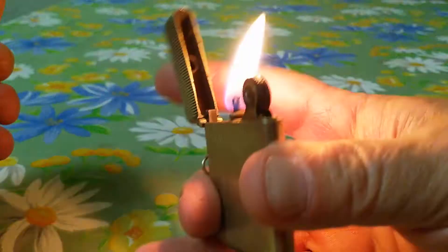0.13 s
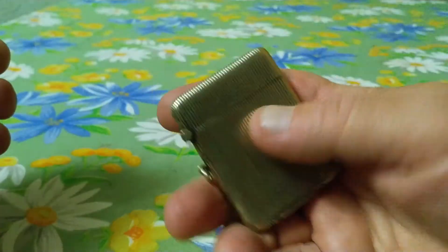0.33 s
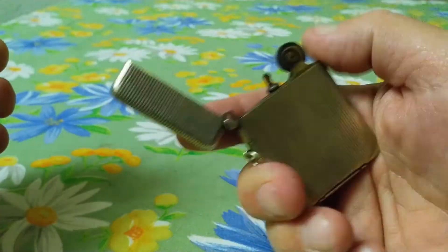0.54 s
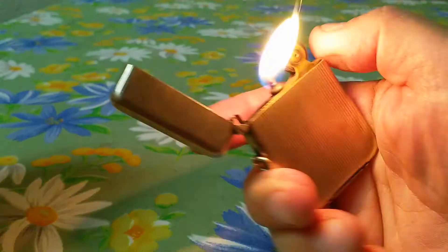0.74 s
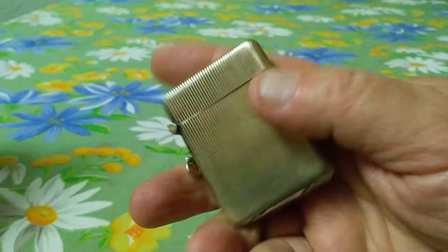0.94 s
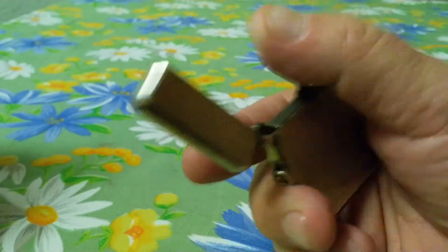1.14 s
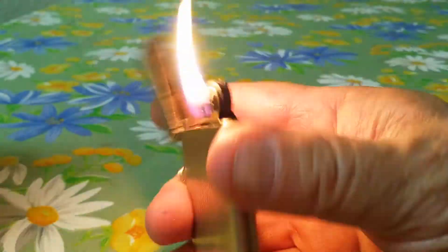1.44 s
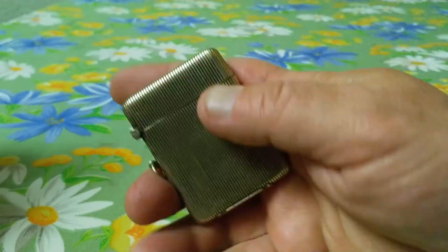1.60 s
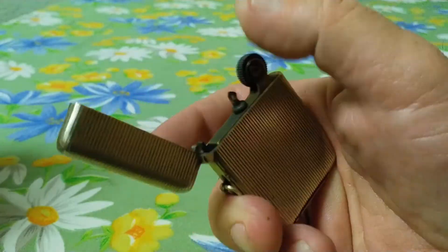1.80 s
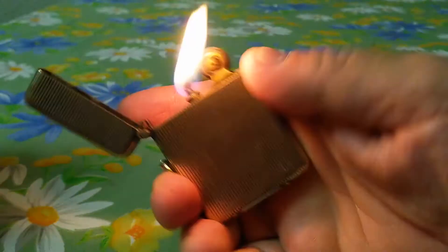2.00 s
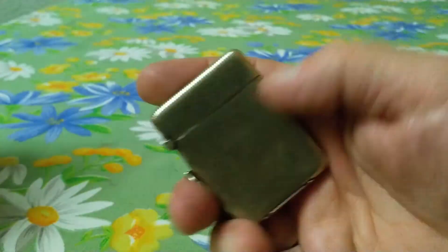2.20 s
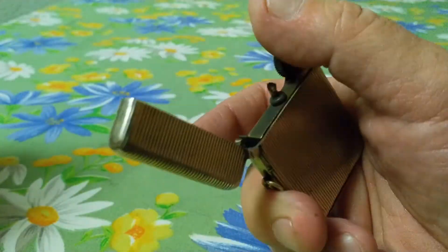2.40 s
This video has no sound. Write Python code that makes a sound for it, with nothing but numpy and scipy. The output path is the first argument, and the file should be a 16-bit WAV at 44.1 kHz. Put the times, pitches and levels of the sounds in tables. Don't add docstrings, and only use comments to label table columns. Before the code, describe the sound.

Sharp metallic lighter clicks and short flint rasps, very close, ending with soft table knocks

```python
import sys
import numpy as np
from scipy import signal
from scipy.fft import rfft, irfft
from scipy.io import wavfile
from scipy.ndimage import uniform_filter1d

SR = 44100
rng = np.random.default_rng(int(sys.argv[2]) if len(sys.argv) > 2 else 0)


def volts_from_db(level):
    exponent = np.asarray(level, float) / 20
    return 10 ** exponent


def generate_wav(signal):
    frames = np.transpose(np.atleast_2d(signal))
    scaled = np.clip(frames, -1, 1) * 32767
    pcm = np.round(scaled).astype(np.int16)
    wavfile.write(sys.argv[1], SR, pcm)


N = 112454

# start in seconds, level in dB of the 10 kHz resonances,
# then shell, wall and edge resonances in dB relative to that level.
OPENS = [
    (0.537, -23.5, -24.5, -3.5, -1.5),
    (1.1885, -27.5, -17.5, 2, 3),
    (1.8227, -28, -27.5, 7, -2),
    (2.3875, -25.5, -18, -0.5, -1.5),
]
APART = 0.55


def evened(x):
    return x / np.sqrt(np.mean(x ** 2) + 1e-20)


def read(points, hz):
    f, value = np.transpose(points)
    return np.interp(np.log(hz + 1), np.log(f + 1), value)


def coloured(x, spectrum):
    gain = volts_from_db(read(spectrum, np.fft.rfftfreq(x.shape[1], 1 / SR)))
    return irfft(rfft(x) * gain, x.shape[1])


def resonate(x, hz, width):
    r = np.exp(-np.pi * width / SR)
    return signal.lfilter([1 - r * r, 0, r * r - 1], [2, -4 * r * np.cos(2 * np.pi * hz / SR), 2 * r * r], x)


def pair(length, share=APART):
    a, b = rng.standard_normal((2, length))
    share = np.clip(share, 0, 1)
    return np.array([a, np.sqrt(1 - share ** 2) * a + share * b])


def hump(t, rise, fall):
    return np.exp(np.where(t < 0, t / rise, -t / fall))


def add(mix, s, sound):
    # time in seconds, left minus right level in dB.
    place = [(0, 0.5), (.29, 0.5), (.95, 0.5), (1.19, 2.5), (1.33, 0.5), (1.6, 0.5), (1.85, 0), (2.19, 2),
             (2.39, 2)]
    side = np.interp(s, *np.transpose(place)) / 2
    k = round(s * SR)
    sound = sound[:, max(-k, 0):] * volts_from_db(np.array([[side], [-side]]))
    part = mix[:, max(k, 0):][:, :sound.shape[1]]
    part += sound[:, :part.shape[1]]


def camera_floor():
    # frequency in Hz, hiss density in dB per Hz.
    hiss_spectrum = [(60, -49.5), (115, -29), (160, -7.5), (280, -4.5), (500, -13.5), (3000, -15),
                     (9000, -24), (16000, -25.5)]
    # motor resonance in Hz, width in Hz, level in dB.
    hum = [(154.8, 32, -80.5), (279, 49, -74.5), (655.5, 46, -82), (1039, 63, -78)]
    # frequency in Hz, left-right likeness from -1 to 1.
    coherence = [(100, 0.91), (500, 0.91), (2400, 0.22), (15000, -0.15)]
    hiss_db = -67.5
    frames, hz = N // 128 + 5, np.fft.rfftfreq(512, 1 / SR)
    a, b, c, d, patches = rng.standard_normal((frames, 257, 5)).T
    patches = uniform_filter1d(patches, 10, 0)
    patches = evened(uniform_filter1d(patches, 20, 1))
    same = np.clip(read(coherence, hz), -1, 1)[:, None]
    left = a + 1j * b
    right = same * left + np.sqrt(1 - same ** 2) * (c + 1j * d)
    z = np.array([left, right]) * volts_from_db(2.6 * patches)
    noise = signal.istft(z, nperseg=512, noverlap=384)[1][:, :N]
    out = volts_from_db(hiss_db) * evened(coloured(noise, hiss_spectrum))
    motor = rng.standard_normal(N)
    for f, width, db in hum:
        out = out + volts_from_db(db) * evened(resonate(resonate(motor, f, width), f, width))
    return out


def room(x):
    # frequency in Hz, 60 dB decay time in seconds.
    decay = [(300, 0.04), (1500, 0.16), (4500, 0.11), (12000, 0.1)]
    gap_s, bend = 0.0023, 1.08
    taps = rng.standard_normal((3, 2, 12000)) * (np.arange(12000) > gap_s * SR)
    hz, t, z = signal.stft(taps, SR, nperseg=128)
    fade = volts_from_db(-60 * (t / read(decay, hz)[:, None]) ** bend)
    tail = signal.istft(z * fade, SR, nperseg=128)[1]
    tail[:, 1] = 0.26 * tail[:, 0] + 0.98 * tail[:, 1]
    turn = np.arange(N) / SR * 11
    out = np.zeros((2, N))
    for k in range(3):
        response = tail[k] / np.linalg.norm(tail[k, 0])
        out += signal.fftconvolve(x * np.cos(turn + k * np.pi / 3), response, axes=1)[:, :N]
    return out


def finger_rubs():
    # centre time in seconds, level in dB, band centre in Hz, width in Hz.
    rubs = [(.205, -70, 2110, 120), (.605, -72, 2025, 119), (1.0, -66.5, 2080, 120),
            (1.069, -66.5, 1366, 900), (1.13, -67.5, 1280, 500), (1.71, -70, 3940, 1467),
            (1.705, -69.5, 9700, 2000), (1.804, -61.5, 1800, 910), (2.026, -62, 4350, 1560)]
    length_s = 0.013
    out, t = np.zeros((2, N)), np.arange(-3000, 3000) / SR
    for s, db, hz, width in rubs:
        rub = evened(resonate(resonate(pair(len(t)), hz, width), hz, width))
        add(out, s + t[0], volts_from_db(db) * np.exp(-(t / length_s) ** 2) * rub)
    return out


def thump(out, s, db, hz, rise_s, t60, push):
    overtone, overtone_db, push_s = 1.777, -8.5, 0.00037
    t = np.arange(5000) / SR
    modes = np.sin(2 * np.pi * hz * t) + volts_from_db(overtone_db) * np.sin(2 * np.pi * overtone * hz * t)
    modes = volts_from_db(-60 * t / t60) * (1 - np.exp(-t / rise_s)) ** 2 * modes
    air = push * t / push_s * np.exp(-t / push_s) * [[0.55], [1]]
    part = out[:, round(s * SR):][:, :len(t)]
    part += volts_from_db(db) * (modes + air)[:, :part.shape[1]]


def hand_thuds():
    # start in seconds, level in dB, pitch in Hz.
    thuds = [(.006, -32.5, 298), (.287, -43.5, 221), (.54, -40, 362), (0.714, -40.5, 350),
             (.954, -42.5, 409), (1.191, -43.5, 379), (1.333, -35, 260), (1.595, -37, 382),
             (1.824, -43.5, 341), (1.955, -36.5, 364), (2.188, -31, 241)]
    out = np.zeros((2, N))
    for s, db, hz in thuds:
        thump(out, s, db, hz, rise_s=0.00066, t60=0.039, push=volts_from_db(-2.5))
    return out


def table_knocks():
    # start in seconds, level in dB, pitch in Hz.
    knocks = [(2.276, -49, 168), (2.288, -42, 234), (2.312, -36.5, 232), (2.343, -54, 271),
              (2.379, -31, 217.5), (2.388, -35, 329), (2.399, -31, 275), (2.417, -34, 227),
              (2.424, -38, 297), (2.429, -29.5, 315), (2.443, -47, 250), (2.455, -38.5, 227)]
    out = np.zeros((2, N))
    for s, db, hz in knocks:
        thump(out, s, db, hz, rise_s=0.0012, t60=0.044, push=0)
    return out


def wheel_and_flame():
    # peak time in seconds, level in dB, rise in seconds, fall in seconds.
    rasps = [(.005, -34, 0.0031, .012), (.714, -35.5, 0.003, 0.012), (1.33, -34.5, 0.0029, 0.013),
             (1.955, -35, 0.0029, 0.013), (1.941, -45, 0.0045, 0.0071), (1.969, -50, 0.0018, 0.0037),
             (2.546, -48.5, 0.0045, 0.033)]
    # peak time in seconds, level in dB.
    sputter = [(.73, -57.5), (1.97, -66)]
    # frequency in Hz, rasp density in dB per Hz.
    rasp_spectrum = [(180, -7), (300, 4), (425, 1), (2000, -15.5), (3760, -3.5), (9240, -7.5),
                     (16000, -9.5)]
    bursts = rasps + [(s, db, 0.004, 0.065) for s, db in sputter]
    out, t = np.zeros((2, N)), np.arange(-2000, 9000) / SR
    for s, db, rise, fall in bursts:
        grit = volts_from_db(2.5 * evened(uniform_filter1d(rng.standard_normal(len(t)), 60)))
        rasp = evened(coloured(pair(len(t)) * grit, rasp_spectrum))
        add(out, s + t[0], volts_from_db(db) * hump(t, rise, fall) * rasp)
    return out


def lid_ring():
    # start in seconds, lid in dB, insert rattle in dB, rattle pitch in Hz, tank in dB.
    rings = [(0.2866, -35, -43.5, 3146, -53.5), (0.955, -48, -46.5, 3146, -51.5),
             (1.189, -61, -58.5, 3146, -73), (1.333, -61, -60, 3760, -41.5), (1.5963, -25, -49, 4020, -80),
             (1.821, -42, -68, 3146, -84), (1.957, -72.5, -71, 3600, -48.5), (2.188, -70, -60, 3530, -48.5)]
    # lid mode in Hz, level in dB.
    modes = [(9750, -9), (9845, -6), (9964, -3), (10100, -6), (10230, 0), (10310, -4)]
    # multiple of the rattle pitch, width in Hz, level in dB.
    rattle = [(1.001, 168, -3.5), (1.05, 1403, 0.62)]
    # frequency in Hz, width in Hz, level in dB.
    tank = [(1042, 200, 4.5), (595, 32, -3)]
    lid_t60, buzz_t60, rise_s = 0.075, 0.076, 0.00052
    clap_hz, clap_db, clap_s = 10160, 14.5, 0.0029
    out, t = np.zeros((2, N)), np.arange(6000) / SR
    clap = np.exp(-(t / clap_s) ** 2)
    for s, db, rattle_db, rattle_hz, tank_db in rings:
        ring = volts_from_db(db + clap_db) * clap * np.sin(2 * np.pi * clap_hz * t)
        for f, g in modes:
            phase = rng.random((2, 1)) * [[0.15], [0.25]]
            ring = ring + volts_from_db(db + g - 60 * t / lid_t60) * np.sin(2 * np.pi * (f * t + phase)) * (1 - clap)
        insert = [(f * rattle_hz, width, g) for f, width, g in rattle]
        for level, group in ((rattle_db, insert), (tank_db, tank)):
            for f, width, g in group:
                buzz = evened(resonate(resonate(pair(len(t), 0.24), f, width), f, 2 * width))
                ring = ring + volts_from_db(level + g - 60 * t / buzz_t60) * buzz
        add(out, s, ring * np.minimum(t / rise_s, 1))
    return out


def open_lid_hum():
    hz, under_click_db, t60, length_s = 9968, -38, 0.7, 0.105
    out, t = np.zeros((2, N)), np.arange(6000) / SR
    for s, db, *_ in OPENS[:-1]:
        tone = np.sin(2 * np.pi * (hz * t + rng.random((2, 1)) / 4))
        add(out, s, volts_from_db(db + under_click_db - 60 * t / t60) * tone * np.exp(-(t / length_s) ** 6))
    return out


def lid_snap():
    start_s, db, blow_hz, rebound_hz = 2.1894, -4, 12800, 500
    out, t = np.zeros((2, N)), np.arange(-100, 160) / SR

    def bell(hz, late_s):
        return hz / blow_hz * np.exp(-(np.pi * hz * (t - late_s)) ** 2)

    snap = 0.2 * bell(blow_hz, -0.00006) - bell(blow_hz, 0) + 0.62 * bell(rebound_hz, 0.00068)
    add(out, start_s + t[0], volts_from_db(db) * snap * np.ones((2, 1)))
    return out


def case_resonances(drive, group, widen):
    grip = 0.025
    out = 0
    for k, (f, width, db) in enumerate(group):
        shift = 1 + grip * (1 - 2 * rng.random())
        mode = resonate(resonate(drive, f * shift, widen * width), f, 4.54 * width)
        out = out + (-1) ** k * volts_from_db(db) * evened(mode)
    return out


def contacts():
    # start in seconds, level in dB of the 10 kHz resonances,
    # then shell, wall and edge in dB relative to it.
    closes = [(.2859, -37.5, 6.5, -28, -10), (.2876, -24, -12.5, -10, -4), (.9522, -42.5, 9.5, -4.5, -16),
              (.9538, -32.5, -6.5, -5, 0.5), (.955, -45.5, 10.5, -13, -9), (1.595, -40.5, 9.5, -3.5, -19),
              (1.5964, -29.5, 1, -4.5, 1), (2.188, -43.5, 16, -6, 16)]
    stops = [(.0041, -31.5, 1.5, 8, -9), (.0053, -26.5, -20.5, -8.5, 1), (.0058, -26.5, -19.5, -7, 4.5),
             (.7129, -48, -22, -15, 18.5), (.7146, -31, -16, -6.5, -1), (.7165, -24.5, -14, -9, -6),
             (1.3297, -36.5, -6, -14, 13), (1.3307, -28.5, -5, -2, -7), (1.332, -28.5, -5, 3.5, -12),
             (1.954, -28.5, -14.5, -9.5, -4), (1.9547, -27.5, -11.5, -6.5, 1.5),
             (1.9562, -28.5, -5, -5.5, -8)]
    # start in
    # seconds, level in dB, then wall and edge in dB relative to it.
    teeth = [(.5362, -45.5, -1.5, 10.5), (.6873, -56.5, -6, -13), (.6912, -68, 2, 15), (.7066, -57, -6, 9),
             (.7554, -50.5, -0.5, -9), (1.1879, -47, 21.5, -10), (1.3002, -68, -5, 22),
             (1.3108, -49, 6.5, 4.5), (1.324, -59.5, 2, 16), (1.3436, -35.5, -16.5, 1),
             (1.3675, -50.5, -2, -9), (1.8214, -37, -2, 9), (1.9412, -52, -8, 7),
             (1.9687, -44.5, -11, -9.5), (2.5325, -58, -17.5, -8), (2.537, -69, -1, 11),
             (2.5425, -47, -12, 2), (2.5469, -41.5, 2, 4)]
    ticks = [(.0535, -61, -12, -4), (.184, -58.5, 0, -3), (.2048, -64.5, -4, -4), (.7696, -69, -6, -8),
             (.7791, -70, -12, -6), (.7878, -61.5, -4, -2), (.7992, -64.5, 3, -2), (.908, -70.5, 3, -11),
             (1.064, -62, -6, -11), (1.0692, -54, -6, -12), (1.397, -70, 5, 7), (1.7901, -49.5, -0.5, -3),
             (2.0001, -54.5, -12, -9), (2.107, -69.5, -17, -8), (2.3403, -52, -5.5, -9.5)]
    # frequency in Hz, width in Hz, level in dB.
    shell_modes = [(633, 654, -2), (1098, 240, -2), (1696, 1030, -8)]
    wall_modes = [(4045, 1600, -6), (4820, 1400, 4), (6680, 1860, -6.5)]
    core_modes = [(7930, 1020, -4), (9250, 600, 5.5), (10380, 680, -4.5), (11420, 480, 1)]
    edge_modes = [(12730, 1100, -14.5), (13800, 850, 8), (16550, 1100, -9.5)]
    # frequency in Hz, width in Hz, level in dB.
    shut_wall_modes = [(3146, 480, 3), (3900, 450, -1), (2552, 1200, -8.5), (5900, 3800, 3.5)]
    light_shell_db = -5
    lead_s, lead_db = 0.0024, -26
    # rows, chatter rise and fall in seconds, clean blow over chatter in dB, wall.
    kinds = (
        (OPENS, 0.00036, 0.00058, 13.1, wall_modes),
        (closes, 0.00013, 0.00045, 9.5, shut_wall_modes),
        (stops, 0.00028, 0.00025, 15.2, wall_modes),
        (teeth, 0.00045, 0.00032, 7.6, wall_modes),
        (ticks, 0.00067, 0.00091, 3, wall_modes),
    )
    out, spread, t = np.zeros((2, N)), np.zeros((2, N)), np.arange(-500, 700) / SR
    for rows, rise, fall, blow_db, walls in kinds:
        envelope = hump(t, rise, fall) + volts_from_db(lead_db) * hump(t, lead_s, fall)
        blow = volts_from_db(blow_db) * (t == 0)
        for s, db, *shell, wall, edge in rows:
            shell_db = shell[0] if shell else light_shell_db
            groups = ((shell_modes, shell_db, 0.2), (walls, wall, APART), (core_modes, 0, APART),
                      (edge_modes, edge, 1))
            for group, relative_db, share in groups:
                gain = volts_from_db(db + relative_db - 16.5)
                direct = pair(len(t), share) * envelope + blow
                add(out, s + t[0], gain * case_resonances(direct, group, 1))
                click = (t == t[rng.integers(500, 560)]) * np.ones((2, 1))
                add(spread, s + t[0], gain * case_resonances(click, group, 1.8))
    return out, spread


def scene():
    lag_s, room_db = 0.000025, -14.5
    snaps, spread = contacts()
    rasp = wheel_and_flame() + finger_rubs()
    ring = lid_ring() + open_lid_hum() + lid_snap()
    near = snaps + rasp + ring
    delay = np.exp(-2j * np.pi * np.fft.rfftfreq(N, 1 / SR) * [[0], [lag_s]])
    near = irfft(rfft(near) * delay, N)
    echo = volts_from_db(room_db) * room(spread + rasp + 0.5 * ring)
    return near + hand_thuds() + table_knocks() + echo + camera_floor()


def band_limit(x):
    return signal.sosfilt(signal.butter(12, 16960, fs=SR, output="sos"), x)


def record(dry):
    dry = signal.lfilter(*signal.butter(N=1, Wn=60, btype="high", fs=SR), dry)
    lowpass = signal.firwin(numtaps=101, cutoff=16250, fs=SR)[None]
    mix = signal.oaconvolve(dry, lowpass, "same")
    return band_limit(mix)


dry = scene()
out = record(dry)
generate_wav(out)
```